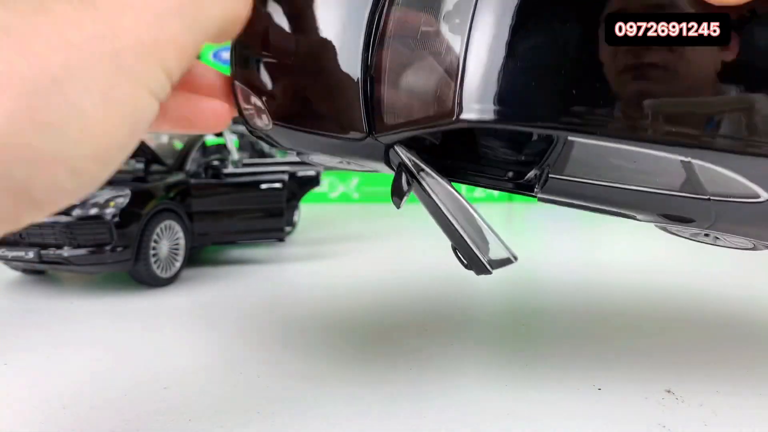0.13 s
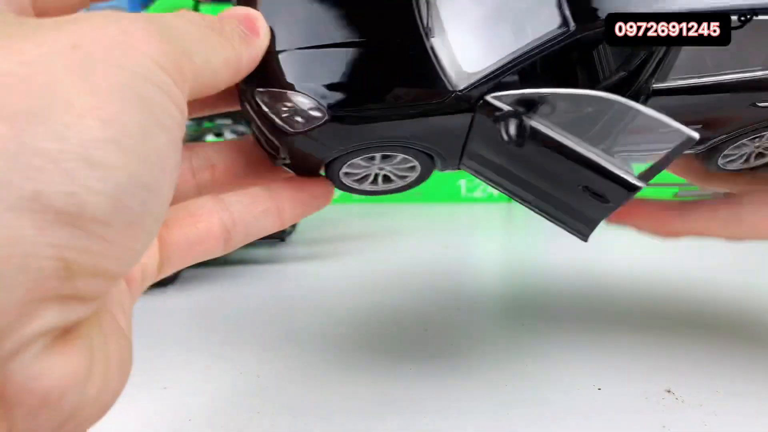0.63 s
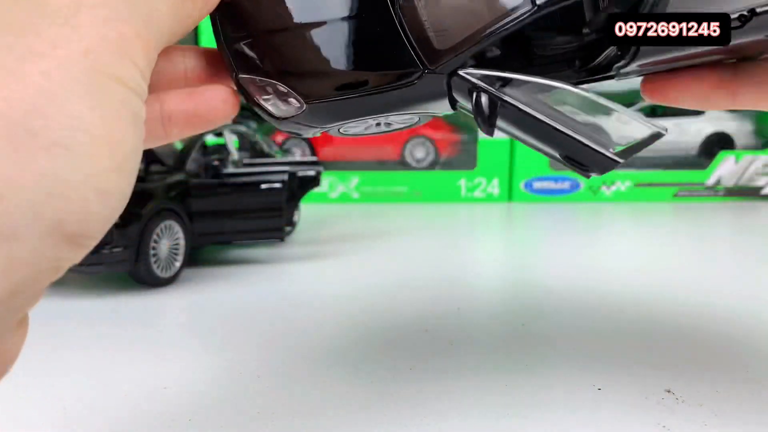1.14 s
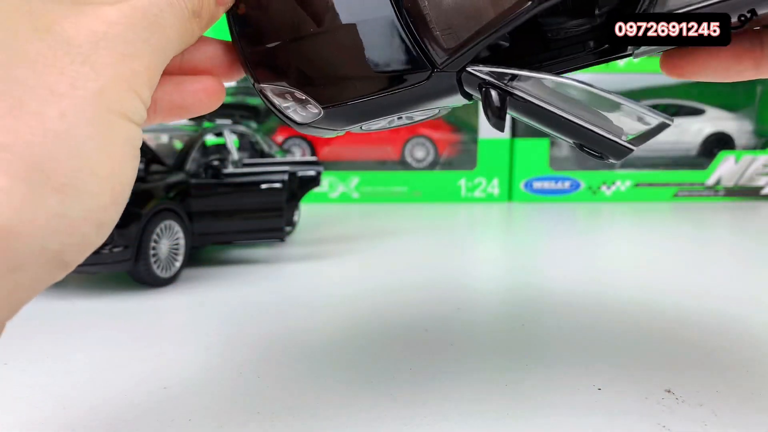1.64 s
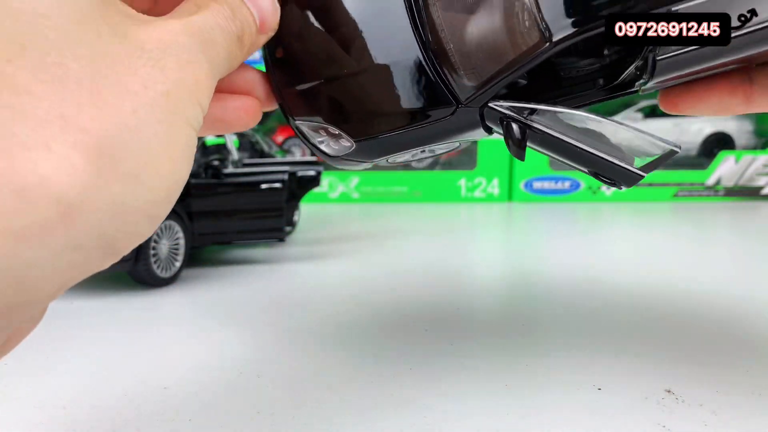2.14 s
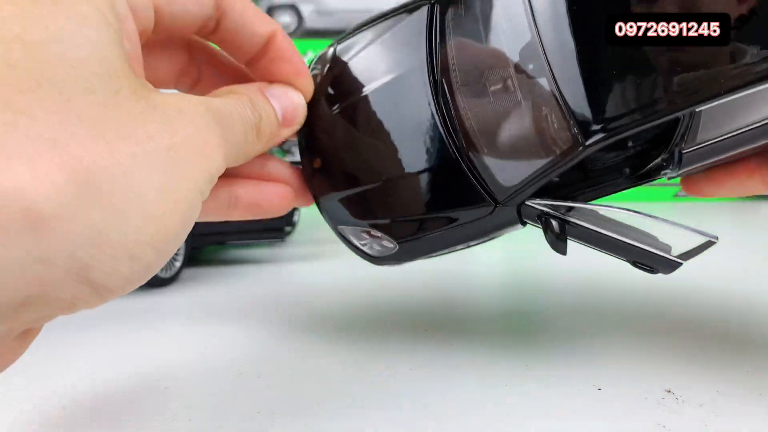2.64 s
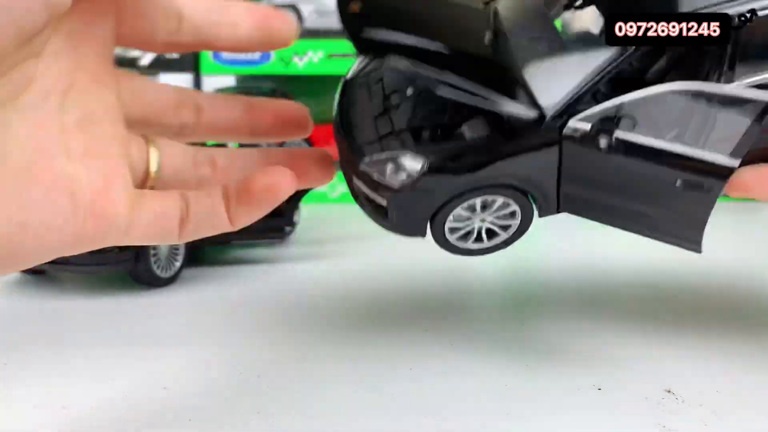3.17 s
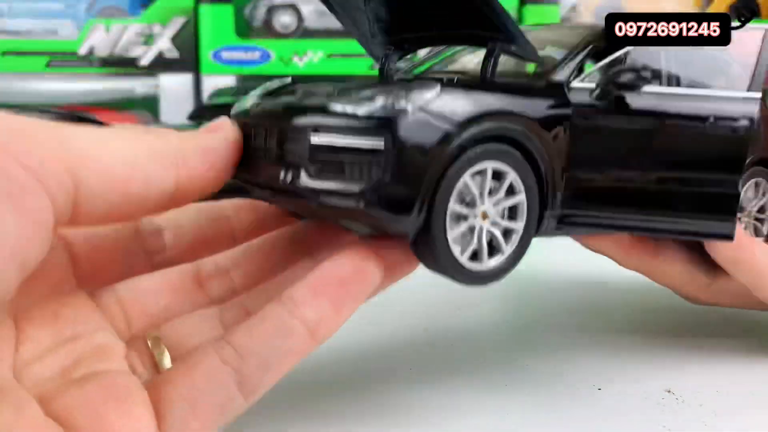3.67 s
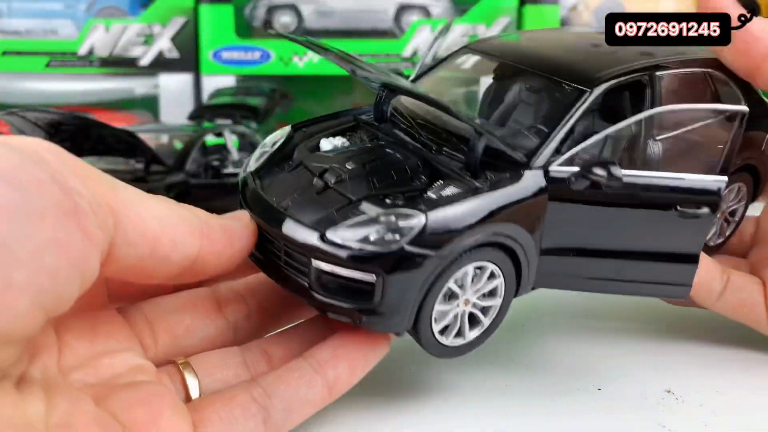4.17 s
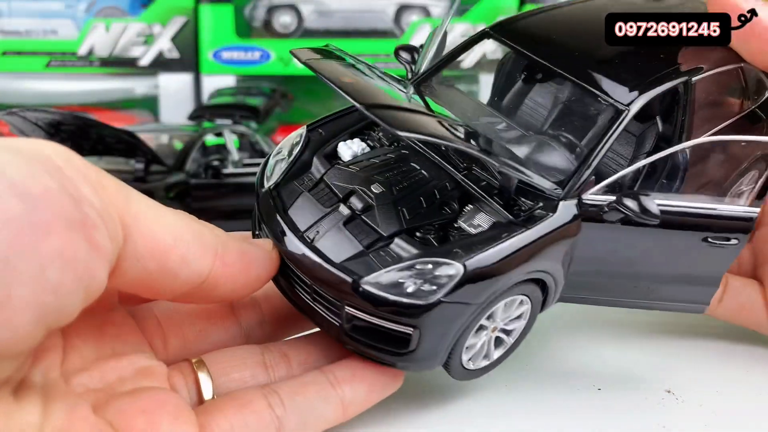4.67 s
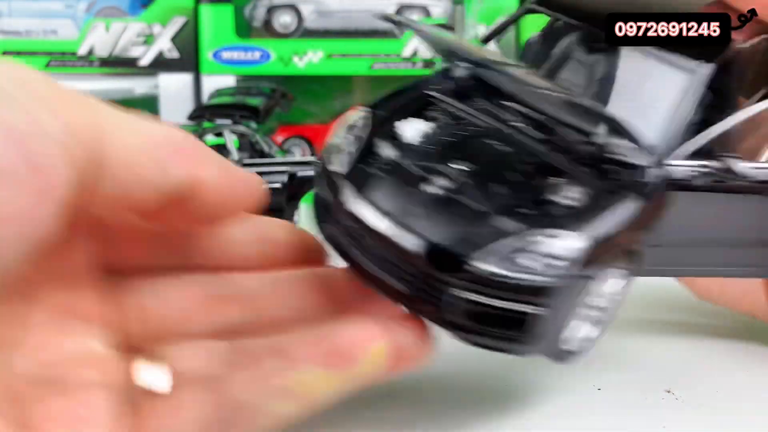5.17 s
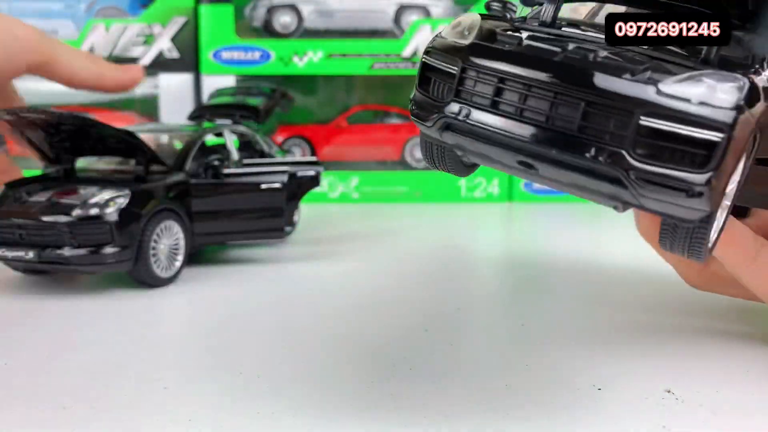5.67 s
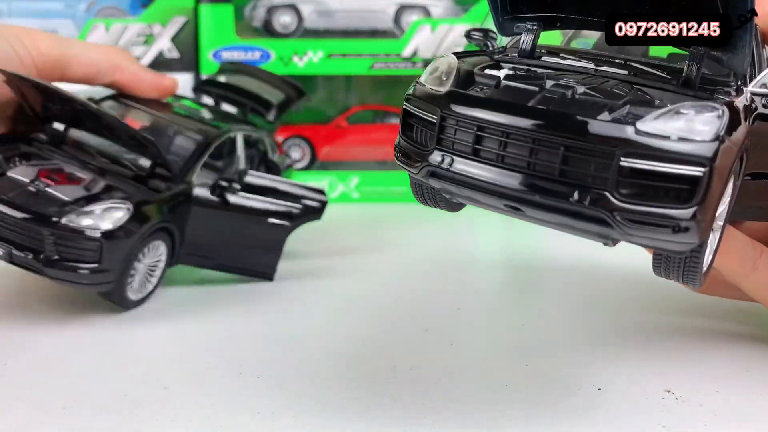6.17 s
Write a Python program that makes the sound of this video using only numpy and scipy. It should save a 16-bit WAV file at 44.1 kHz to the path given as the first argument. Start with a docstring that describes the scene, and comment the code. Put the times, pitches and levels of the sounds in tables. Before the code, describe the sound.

Close-up handling of a small hollow die-cast car, in a quiet small room with only a short, faint reflection. At 0 s a dull clack and brief scrape, with a low bump, fade quickly. Soft knocks and rubbing follow at 0.15-0.7 s, then near quiet with tiny taps until 1.5. At 1.83-1.9 two bright, crisp clacks stand out, followed by small dull knocks to 2.25 and lighter taps around 2.5-2.8. A short scuff at 2.9 leads to clicks at 3.1-3.3, a strong scraping clack at 3.47, and knocks until 4.3. It is very sparse until ticks and light rubs at 5.0-5.25. From 5.7 a second model drags in short hollow scrapes with low rumbles; clacks at 5.95 and 6.15 precede a thin rising tyre squeak near 6.3. A faint wavering low hum and hiss continue beneath.

```python
"""Small die-cast car in the hands

Hands turn a small die-cast car close by in a quiet room: door, bonnet and wheels tick and knock,
as bursts of contact noise driving a hollow knock, shell modes and a sharp crack. Fingers rub over the
shell as stick-slip grains; a second model dragged over the table drones, and a tyre skids, as narrow noise.
Below lie a wavering hum, a rumble that grows with each drag and a faint hiss.
"""
import sys
import numpy as np
from scipy import signal
from scipy.fft import rfft, irfft
from scipy.io import wavfile
from scipy.ndimage import uniform_filter1d

SR = 44100
rng = np.random.default_rng(int(sys.argv[2]) if len(sys.argv) > 2 else 0)


def level_to_linear(level):
    """Convert decibel levels to linear amplitude factors, elementwise."""
    exponent = np.asarray(level, float) / 20
    return 10 ** exponent


def store_wav(level_fs):
    """Save 16-bit WAV to argv[1]."""
    pcm = np.round(np.clip(np.atleast_2d(level_fs), -1, 1) * 32767)
    wavfile.write(sys.argv[1], SR, pcm.T.astype(np.int16))


N = 278271

# level of the hum over time: time_s, level_db (before its waver)
HUM_LEVEL = [(0.0, -45.5), (0.07, -55), (0.47, -62.5), (0.91, -55.5), (1.03, -69), (1.23, -54.5),
             (1.53, -76.5), (1.6, -59), (2.07, -66.5), (2.13, -53.5), (2.55, -69.5), (2.62, -55),
             (2.69, -62.5), (2.88, -59), (2.97, -70), (3.0, -64.5), (3.25, -71), (3.29, -61.5), (3.67, -59),
             (4.02, -67), (4.13, -53), (4.53, -72), (5.43, -50), (5.64, -71), (5.69, -60.5), (5.96, -61.5),
             (6.17, -54.5), (6.31, -58)]
# spectrum of the rumble, relative: pitch_hz, level_db
RUMBLE_COLOUR = [(15, -46), (25, -16), (64, 9), (96, -12.5), (130, -4), (163, -17), (243, -19.5),
                 (472, -33), (525, -36), (600, -46.5), (780, -75), (1320, -120)]
# spectrum of the faint hiss, relative: pitch_hz, level_db
AIR_COLOUR = [(400, -5), (700, 3.5), (1400, -2), (4000, -9.5), (7000, -10.5), (12000, -10), (16300, -14)]
# left-right likeness of the room tone: pitch_hz, likeness (1 = same on both sides)
LIKENESS = [(60, 0.96), (150, 0.96), (400, 0.61), (1000, 0.097), (3000, 0)]
# weight shifts in the hand or on the table: start_s, length_s, level_db, swell_db (start to end)
DRAGS = [(0.0, 0.061, -50.5, -27), (0.32, 0.049, -70, 1.5), (1.129, 0.26, -69.5, -10.5),
         (1.838, 0.046, -68.5, -6.5), (2.155, 0.09, -74, 1), (2.603, 0.0366, -66.5, -7),
         (3.28, 0.16, -73, 12), (3.462, 0.34, -61.5, -4), (3.996, 0.11, -64.5, -4),
         (4.193, 0.072, -64, -3.5), (4.817, 0.05, -62.5, -7.5), (5.015, 0.047, -62.5, -3.5),
         (5.635, .04, -69, -2), (5.698, 0.19, -54, -16.5), (5.931, 0.16, -49, -17.5),
         (6.157, 0.06, -49.5, -11.5)]
# spectra of the rubbing, relative: pitch_hz, level_db
BODY_COLOUR = [(420, -21), (600, -6), (760, -2), (820, -4), (920, 0.5), (1100, -3.5), (1220, -3.5),
               (1350, -2.5), (1520, 0), (1750, -8.5), (2050, -15), (2600, -18)]  # hollow scrape
HISS_COLOUR = [(1800, -2.5), (2500, -2.5), (4000, -7), (6500, -15.5), (7600, -14.5)]  # skin hiss
FINE_COLOUR = [(6500, -55), (8000, 5), (12000, -2), (16000, -2)]  # fine hiss
LOW_COLOUR = [(140, -8.5), (200, 4), (270, 3.5), (450, -7), (600, -15.5), (750, -37)]  # low drag
# a part scuffs along after a knock and dies away: start_s, scrape level_db, hiss_db (over the scrape), t60_s
SCUFFS = [(0.0, -46.5, -11.5, 0.26), (0.343, -48.5, -5, 0.1), (0.524, -51, -9, 0.17),
          (0.674, -61.5, -3, 0.32), (1.497, -54, -13.5, 0.07), (1.843, -53, 5, 0.32),
          (1.898, -73, 14, 0.51), (2.151, -51, -36, .06), (2.244, -63.5, -28.5, .12),
          (2.788, -70.5, 17.5, 0.058), (3.005, -65.5, -28, .15), (3.143, -63.5, -7.5, 0.24),
          (3.337, -57, 15.5, 0.029), (3.469, -36, -4.5, 0.027), (3.865, -64.5, 4, 0.12),
          (4.045, -58.5, 4.5, 0.24), (4.199, -55, -15.5, 0.068), (4.286, -41.5, -6.5, 0.038),
          (5.024, -58.5, 10, 0.077), (5.084, -53, 1.5, 0.081), (5.153, -64, 6, 0.1), (5.26, -61, -8, 0.087),
          (5.698, -52.5, -2, 0.59), (5.943, -47, -10, 0.11), (6.153, -38, -6.5, 0.25)]
# fingers and tyres slide: start_s, length_s, scrape level_db, hiss_db (over the scrape), swell_db (start to end)
SLIDES = [(0.0, 0.066, -44.5, -0.5, -31), (0.294, 0.27, -60, -7.5, 7), (0.569, .12, -75.5, -7, 19),
          (2.03, 0.19, -74.5, -19.5, 4), (2.434, 0.093, -84.5, -27.5, 1.5), (2.709, 0.2, -71, -12.5, 7),
          (2.875, 0.039, -65.5, -15, 7), (2.917, 0.065, -45.5, -17.5, 1), (3.337, 0.092, -70, -3.5, 0),
          (3.44, 0.36, -63.5, -3, -0.5), (3.946, 0.091, -78, 1.5, 10), (4.123, 0.21, -73.5, -12, 0),
          (4.979, 0.036, -73.5, -19, 9), (5.1, 0.13, -73, 4.5, -7), (5.22, 0.07, -68.5, -10.5, 8),
          (5.74, 0.16, -87.5, -9.5, -18), (5.943, 0.076, -62.5, 7.5, 7), (6.01, 0.14, -73.5, 3.5, 3.5),
          (6.173, 0.11, -60, 5, -6.5)]
# bright clacks, levels before the layer trims:
# start_s, level_db, pitch_hz, ring_db (shell over level), crack_db (over level), contact_ms
CLACKS = [(0.001, -31.5, 935, -19, -24, 5.1), (0.03, -40.5, 1450, -11, -14.5, 3.9),
          (0.343, -38, 916, -6.5, -32, 2.9), (0.522, -41.5, 966, -8.5, -12.5, 12),
          (0.558, -39.5, 900, -15, -21, 2.3), (0.646, -39.5, 885, -17.5, -38, 4.4),
          (0.68, -47, 850, 0.5, -3, 2.6), (0.97, -59, 893, -3, -19, 4.9), (1.36, -56, 1460, -6.5, -29, 1.4),
          (1.497, -49.5, 1378, -7.5, -31, 2.9), (1.826, -31, 972, 4, 12, 2.66),
          (1.832, -31, 1975, -20, 8.5, 3.9), (1.892, -23.5, 1520, -1, -6, 2.2),
          (2.025, -56.5, 760, -11, -11, 4.1), (2.043, -56.5, 1600, -7, -1, 1.9),
          (2.082, -49, 740, -16, -34, 1.5), (2.12, -45, 900, -15.5, -37, 2.1),
          (2.179, -68, 1610, -2.5, -4, 2.5), (2.606, -43.5, 1405, -13.5, -8.5, 5.6),
          (2.788, -49, 1460, 0.5, -4.5, 4), (2.839, -54.5, 1670, -12, -3.5, 5.4),
          (3.144, -56, 1500, 1.5, -3.5, 4.2), (3.211, -46, 1054, 4.5, 11, 1.02),
          (3.333, -40.5, 1037, 4.5, -12.5, 1.8), (3.466, -29.5, 804, -25, -12, 0.76),
          (3.717, -66.5, 1430, 9, 5, 2.6), (3.863, -57, 1330, -12, -25, 3.4),
          (4.04, -44.5, 1930, -7.5, -18.5, 3.9), (5.016, -51, 1124, 2, 7, 4.4),
          (5.025, -42, 1750, -15, -0.5, 5.5), (5.078, -52, 1730, -9, -12, 3),
          (5.093, -45, 1772, -20, -17, 7.1), (5.154, -60, 1300, 2, -18, 1.1),
          (5.255, -58, 1030, -15, -11, 2.8), (5.7, -58, 832, -23, -42, 1.7),
          (5.95, -41.5, 730, 5, -34, 3.8), (5.964, -42.5, 1590, 6, -13, 5), (6.154, -41, 780, 0.5, 9, 3.2),
          (6.179, -38, 710, -19, -16, 1.4)]
# dull knocks, the shell damped by the hand: start_s, level_db (before the layer trims), pitch_hz, contact_ms
KNOCKS = [(0.16, -52.5, 865, 8.2), (0.244, -59.5, 830, 3.5), (0.295, -49, 897, 1.9),
          (0.616, -45, 1040, 3.6), (1.694, -47, 914, 1.26), (2.152, -42.5, 890, 0.78),
          (2.201, -59.5, 776, 2.5), (2.231, -42, 873, 0.49), (2.246, -48.5, 746, 1.76),
          (2.498, -48, 930, 2.8), (2.513, -66, 1480, 2), (2.585, -57.5, 1390, 2.5), (2.738, -58.5, 999, 3),
          (3.494, -41, 1055, 2.5), (3.537, -49, 605, 3.8), (3.635, -48, 990, 6.5),
          (4.149, -60.5, 1090, 2.9), (4.199, -54.5, 1050, 1.4), (4.25, -53.5, 590, 2.7),
          (4.279, -35.5, 1200, 3.6), (4.817, -68, 1202, 3.4), (4.845, -67.5, 653, 3.2),
          (4.905, -71, 1520, 2.4), (4.935, -63.5, 1514, 2.4), (4.982, -64, 1200, 2.3),
          (5.932, -41, 1355, 0.83)]
# thin ticks, almost only crack: start_s, level_db (before the layer trims)
TICKS = [(1.718, -86), (1.785, -89), (2.314, -94), (3.112, -87)]
# modes of the metal shell, before the spread of each hit: pitch_hz, level_db, t60_s
SHELL_MODES = [(2090, -6, .01), (2420, -4, .008), (2900, -3, .008), (3270, -1, .01), (3800, -3, .008),
               (4480, -3, .007), (5160, -4, .006), (5800, -5, .006), (6450, -5, .006), (7300, -6, .006)]
# spectrum of the sharp crack, relative: pitch_hz, level_db
CRACK_COLOUR = [(3000, -6), (6500, -22), (9500, -0.5), (12000, -4), (15500, 0.5), (16500, -25)]
# spectrum of the pitchless rattle of loose parts, relative: pitch_hz, level_db
PUFF_COLOUR = [(450, -25), (700, -10), (1000, 2.5), (1800, 1), (2600, -12), (4000, -19.5)]
# how fast the room dies: pitch_hz, t60_s
ROOM_DECAY = [(400, 0.065), (1500, 0.15), (4000, 0.41), (12000, 0.073)]
# the dragged model drones: start_s, length_s, level_db, swell_db (start to end)
DRONES = [(5.708, 0.078, -58.5, -6), (5.929, 0.028, -54.5, -8.5), (6.146, 0.16, -52.5, -9.5)]
# a tyre skids: time_s, level_db, pitch_hz
SQUEAK = [(6.19, -55.5, 1512), (6.264, -58, 1793), (6.292, -50.5, 1935), (6.296, -64, 1939),
          (6.31, -43.5, 1882)]
# stereo phase turn put on the left channel: pitch_hz, phase_rad
LEFT_PHASE = [(700, 0), (2500, -2.2), (5000, -1.5), (7000, -.4), (7800, -2.9), (9000, -3.4), (10300, -6),
              (11700, -6.6), (12700, -9.15), (14200, -9.7), (15000, -12.4), (16500, -12.6)]


def evened(x):
    """Scales to rms 1."""
    return x / np.sqrt(np.mean(x ** 2) + 1e-20)


def read(points, hz):
    """Value of a table, interpolated over log frequency."""
    f, value = np.transpose(points)
    return np.interp(np.log(hz + 1), np.log(f + 1), value)


def coloured(x, points):
    """Filters x by a spectrum in dB, all but silent far outside it."""
    hz = np.fft.rfftfreq(x.shape[-1], 1 / SR)
    ends = [(points[0][0] / 2, -90), *points, (points[-1][0] * 2, -90)]
    return irfft(rfft(x) * level_to_linear(read(ends, hz)), x.shape[-1])


def add(mix, s, sound):
    """Lays a sound into the mix at s seconds."""
    part = mix[round(s * SR):][:len(sound)]
    part += sound[:len(part)]


def waver(size):
    """Slow random drift, rms 1; size is the smoothing in samples."""
    return evened(uniform_filter1d(uniform_filter1d(rng.standard_normal(N), size), size))


def stroke(start, length, db, swell_db, attack_s=0.01703):
    """Gain of one gesture: rises around its start, swells or sags in decibels, then lets go."""
    let_go_t60 = 0.11  # s
    t = np.arange(N) / SR - start
    held = np.clip(t, 0, length)
    fall_db = -60 * (t - held) / let_go_t60 * (t > 0)
    return np.clip(t / attack_s + .5, 0, 1) * level_to_linear(db + swell_db * held / length + fall_db)


def drag():
    """How hard the weight drags, as a gain."""
    return sum(stroke(*row) for row in DRAGS)


def hum(z, hz):
    """Noise in a narrow resonance, levelled to a steady drone that then wavers."""
    centre_hz, width_hz, waver_db = 61.4, 7.3, 3
    tone = irfft(z / (1 + ((hz - centre_hz) / width_hz) ** 2), N)
    tone /= np.sqrt(uniform_filter1d(tone.mean(0) ** 2, 3000) + 1e-20)
    level = np.interp(np.arange(N) / SR, *np.transpose(HUM_LEVEL))
    return tone * level_to_linear(uniform_filter1d(level, size=900) + waver_db * waver(2000))


def rumble(z, hz):
    """Low noise above 85 Hz that wavers and grows with each drag."""
    idle_db, waver_db, drag_db = -68.5, 3, 1.5  # drag_db is over the low drag
    noise = evened(irfft(z * level_to_linear(read(RUMBLE_COLOUR, hz)) * (hz > 85), N))
    return noise * (level_to_linear(idle_db + waver_db * waver(3000)) + level_to_linear(drag_db) * drag())


def air(z, hz):
    """A faint even hiss: steady coloured noise."""
    return level_to_linear(-78) * evened(irfft(z * level_to_linear(read(AIR_COLOUR, hz)), N))


def room_tone():
    """Hum, rumble and hiss from one stereo noise, alike on both sides in the bass and apart in the treble."""
    hz = np.fft.rfftfreq(N, 1 / SR)
    a, b, c, d = rng.standard_normal((4, len(hz)))
    same = np.clip(read(LIKENESS, hz), -1, 1)
    left = a + 1j * b
    right = same * left + np.sqrt(1 - same ** 2) * (c + 1j * d)
    z = np.array([left, right])
    return (hum(z, hz) + rumble(z, hz)) * level_to_linear([[.5], [-.5]]) + air(z, hz)


def slip_grains():
    """Dense uneven stick-slip grains, heard through hollow body, skin (two hisses) and table."""
    slip_hz, slip_spread_db, grip_db = 6000, 2.8, 2.2  # mean grain rate, and spreads
    size_db = slip_spread_db * np.minimum(rng.exponential(1, (4, 1, N)), 4)
    slips = level_to_linear(size_db) * (rng.random((4, 1, N)) < slip_hz / SR)
    grip = level_to_linear(grip_db * evened(uniform_filter1d(rng.standard_normal(N), 400)))  # comes and goes
    noise = rng.standard_normal((4, 3, N)) * slips * grip
    # a wide contact: each channel hears partly its own noise
    own = np.reshape([0.93, 1.8, 1.5, 0.24], (4, 1, 1))
    noise = noise[:, :1] + own * noise[:, 1:]
    colours = BODY_COLOUR, HISS_COLOUR, FINE_COLOUR, LOW_COLOUR
    return [evened(coloured(n, colour)) for n, colour in zip(noise, colours)]


def scuffs(body, hiss, fine):
    """A part scuffs along after a knock: scrape and hiss die away together."""
    skin = hiss + level_to_linear(-16) * fine
    out = np.zeros((2, N))
    for s, db, hiss_db, t60 in SCUFFS:
        out += stroke(s, t60, db, -60, attack_s=0.013) * (body + level_to_linear(hiss_db) * skin)
    return out


def slides(body, hiss, fine):
    """Fingers and tyres slide: scrape and hiss held over a stroke that swells or sags."""
    skin = hiss + level_to_linear(-7) * fine
    out = np.zeros((2, N))
    for s, length, db, hiss_db, swell_db in SLIDES:
        out += stroke(s, length, db, swell_db) * (body + level_to_linear(hiss_db) * skin)
    return out


def patchy(x, patch_db):
    """The colour of a scrape shifts as the contact wanders over thick and thin parts."""
    z = signal.stft(x, nperseg=256)[2]
    field = rng.standard_normal(z.shape[1:])  # frequency by time
    field = evened(uniform_filter1d(uniform_filter1d(field, size=3, axis=0), size=14, axis=1))
    return signal.istft(z * level_to_linear(patch_db * field), nperseg=256)[1][:, :N]


def rubs():
    """Drags, scuffs and slides share the same stick-slip grains."""
    body, hiss, fine, low = slip_grains()
    return patchy(low * drag() + scuffs(body, hiss, fine) + slides(body, hiss, fine), 3.1)


def ring(hz, t60, size=3000):
    """One dying mode."""
    t = np.arange(size) / SR
    return level_to_linear(-60 * t / t60) * np.sin(2 * np.pi * hz * t)


def shell_ring():
    """The metal shell's modes, a little different in pitch and level at each hit."""
    pitch_spread, level_spread_db = .08, 2.5
    spread = rng.uniform(-0.76, 1, (len(SHELL_MODES), 2))
    return sum(level_to_linear(db + level_spread_db * e) * ring(hz * (1 + pitch_spread * v), t60)
               for (hz, db, t60), (v, e) in zip(SHELL_MODES, spread))


def hit_layers(hz, ms):
    """A brief chatter of contacts drives a hollow knock, a loose rattle, the metal shell and a sharp crack."""
    knock_t60, crack_share = .011, .7  # s; crack decay as a share of the contact time
    t = np.arange(2048) / SR
    a, b, c = rng.standard_normal((3, 2048))
    u = t * 1000 / max(ms, .2)
    contact = np.exp(-u) * np.minimum(u / .5, 1)  # long contacts also start softly
    drive = (a * 0.18 + np.cos(2 * np.pi * hz * t) * 0.13) * contact
    knock = signal.fftconvolve(drive, ring(hz, knock_t60))
    # the rolls leave room for the filter's pre-ring
    puff = coloured(np.roll(c * contact, 60), PUFF_COLOUR)
    shell = signal.fftconvolve(np.diff(a * contact), shell_ring())
    snap = b * np.exp(-u / crack_share) * np.minimum(u / 0.33, 1)
    crack = coloured(np.roll(snap, 20), CRACK_COLOUR)
    return knock, puff, shell, crack


def hits():
    """Clacks, dull knocks and thin ticks are one mechanism with its layers set to different peaks."""
    rows = list(CLACKS)
    rows += [(s, db, hz, -34.5, -48, ms) for s, db, hz, ms in KNOCKS]  # hardly any ring or crack
    rows += [(s, db, 900, 2, 21.5, 3) for s, db in TICKS]  # crack far above the knock
    out = np.zeros(N)
    for s, db, hz, ring_db, crack_db, ms in rows:
        trims_db = -2.5, -3.5, ring_db + 5, crack_db + 8
        for part, trim_db in zip(hit_layers(hz, ms), trims_db):
            add(out, s, level_to_linear(db + trim_db) * part / abs(part).max())
    too_small_for_bass = signal.butter(3, 560, "high", fs=SR, output="sos")
    return signal.sosfilt(too_small_for_bass, out)


def room(x):
    """Sparse taps of random sign, each band dying at its own speed."""
    size, first, gap = SR // 2, 120, 20  # samples
    taps = np.zeros((2, size))
    at = np.arange(first, size - gap, gap) + rng.integers(0, gap, (2, (size - first - 1) // gap))
    np.put_along_axis(taps, at, rng.choice([-1., 1.], at.shape), 1)
    hz, t, z = signal.stft(taps, SR, nperseg=256)
    tail = signal.istft(z * level_to_linear(-60 * t / read(ROOM_DECAY, hz)[:, None]), SR, nperseg=256)[1]
    return signal.fftconvolve(x[None], tail / np.linalg.norm(tail[0]), axes=1)[:, :N]


def drone():
    """The hollow body of the dragged model answers at one fuzzy pitch: a narrow band of noise."""
    centre_hz, width_hz = 767, 33
    hz = np.fft.rfftfreq(N, 1 / SR)
    resonance = 1 / (1 + ((hz - centre_hz) / width_hz) ** 2)
    tone = evened(irfft(rfft(rng.standard_normal((1, N))) * resonance, N))
    return tone * sum(stroke(*row) for row in DRONES)


def squeak():
    """A skidding tyre: slow noise carried on a pitch that climbs, then eases back."""
    s, db, hz = np.transpose(SQUEAK)
    t = np.arange(N) / SR
    slow = uniform_filter1d(rng.standard_normal((2, N)), size=250, axis=1)
    carrier = np.exp(2j * np.pi * np.cumsum(np.interp(t, s, hz)) / SR)
    tone = evened((carrier * (slow[0] + 1j * slow[1])).real)
    return level_to_linear(np.interp(t, s, db, left=-120)) * tone


def scene():
    """The car sits a little to the left, with a short room behind it and the room tone below."""
    car = rubs() + hits() + drone() + squeak()
    return car * level_to_linear([[.8], [-.8]]) + level_to_linear(-12) * room(car.mean(0)) + room_tone()


def low_pass(x):
    """Removes everything above the highest recorded frequency."""
    return signal.sosfilt(signal.butter(12, 16650, fs=SR, output="sos"), x)


def record(dry):
    """Joint stereo: above about 8 kHz both channels carry one signal, its phase turned on the left."""
    joint_hz = 7990
    hz, z = np.fft.rfftfreq(N, 1 / SR), rfft(dry)
    joint = 1 / (1 + (joint_hz / (hz + 1)) ** 20)
    z = (1 - joint) * z + joint * z[0]
    z[0] *= np.exp(1j * read(LEFT_PHASE, hz))
    return low_pass(irfft(z * (hz < 16600), N))  # nothing passes above 16.6 kHz


dry = scene()
out = record(dry)
store_wav(out)
```